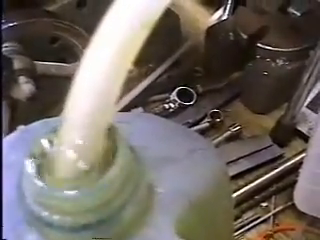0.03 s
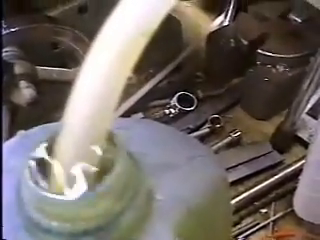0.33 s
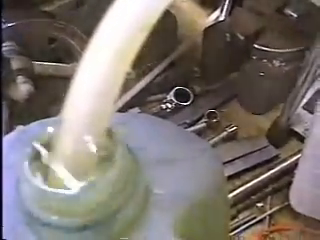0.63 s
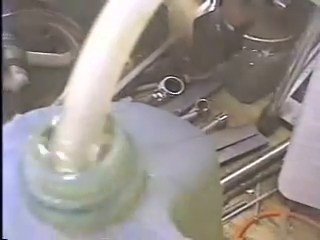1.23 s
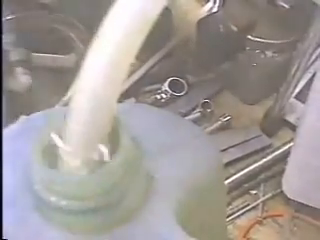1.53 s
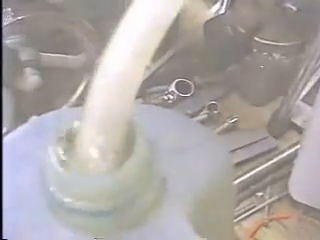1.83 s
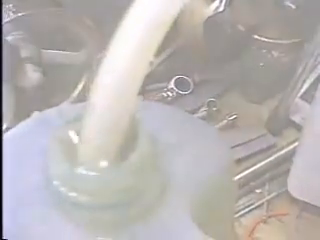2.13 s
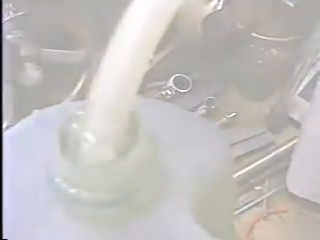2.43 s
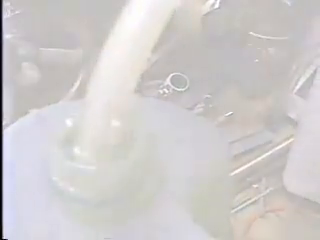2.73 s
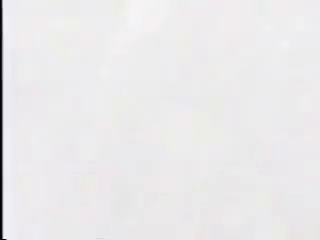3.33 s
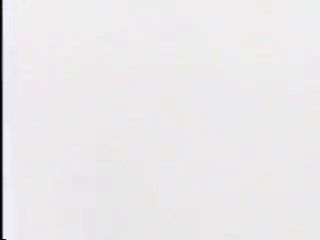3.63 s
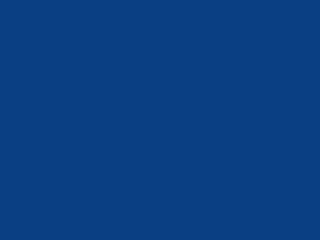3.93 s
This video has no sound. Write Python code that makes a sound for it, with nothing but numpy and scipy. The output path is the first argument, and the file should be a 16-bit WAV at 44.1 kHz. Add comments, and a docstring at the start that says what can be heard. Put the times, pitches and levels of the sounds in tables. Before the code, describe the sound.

From the start, liquid streams from a hose into a plastic jug on the left, a quiet, hollow rush with many small bubbles and occasional larger gulps. A pump motor hums faintly underneath. From about 2.3 seconds the filling and hum fade, with a few weaker gulps near 2.9 and 3.4 seconds. A soft, steady hiss remains on both sides until everything cuts out at about 3.9 seconds.

```python
"""A pump sends a steady stream of liquid through a hose into a plastic jug in a workshop.
From the start, on the left, the motor hums and the stream rushes into the hollow jug,
where trapped air rings as many small bubbles and a few larger gulps.
After about two seconds all of this fades, leaving the recorder's hiss on both sides.
Just before four seconds the sound cuts out."""
import sys
import numpy as np
from scipy import signal
from scipy.fft import rfft, irfft, next_fast_len
from scipy.io import wavfile
from scipy.ndimage import map_coordinates

SR = 44100
rng = np.random.default_rng(int(sys.argv[2]) if len(sys.argv) > 2 else 0)


def materialize(psi):
    """Save the field psi as 16-bit PCM at rate SR to the path in sys.argv[1].

    A 1-D psi becomes a single channel; in a 2-D psi each row is a channel.
    """
    bounded = np.clip(np.atleast_2d(psi).T, -1, 1)
    quanta = np.round(bounded * 32767).astype(np.int16)
    wavfile.write(sys.argv[1], SR, quanta)


N = 176400

# Tone of the hiss on each side, from low to high: frequency_hz, level_db
HISS_LEFT_TONE = [(20, 9.5), (40, -10), (68, -20), (100, 0), (190, 1.5), (800, 3), (2500, -2), (5000, -5),
                  (8500, -12.3), (10200, -19.5), (11500, -50)]
HISS_RIGHT_TONE = [(20, 11.5), (42, -0.5), (62, 0), (100, 1.5), (500, -0.5), (2000, -2), (5000, -4.5),
                   (8500, -8.5), (10200, -15), (11500, -29.5)]
# The left hiss grows a little near the end: time_s, level_db
HISS_LEFT_LEVEL = [(0, -57.5), (3.05, -57), (3.5, -55.5), (3.9, -54.5)]
# How far the wave sits off zero, where 1 is full scale: left_offset, right_offset
ZERO_OFFSET = [-0.0036, -0.0014]
# The tones that make up the motor's hum: cycles_per_shaft_turn, level_db
HUM_TONES = {4: -69.5, 7: -52, 8: -53.3, 14: -55, 21: -70, 28: -69, 40: -69.5}
# How the hum is turned up or down, before the fade: time_s, gain_db
HUM_GAIN = [(0, 1), (2.4, -0.5), (2.8, 1.5), (3.6, 4)]
# Overall tone of the liquid in the jug: frequency_hz, level_db
LIQUID_TONE = [(20, -61), (80, -46), (190, -17), (260, -5), (400, 0.5), (700, -1), (1100, -4.5), (1650, -4),
               (2100, -11), (3000, -15.5), (5000, -25), (9000, -50.5)]
# Pitches at which the jug and its surroundings ring: pitch_hz, half_width_hz, boost_db
JUG_RESONANCES = [(340.3, 15, 6.5), (381.4, 16.7, 8), (426.4, 43, 9.2), (497.3, 28, 7), (574, 17.5, 5.5),
                  (635, 8.4, 3.5), (750, 19, 4), (838, 13.7, 11.5), (871.8, 24.8, 10.5), (1034, 100, 4.5),
                  (1333, 12, 7), (1437, 18, 5), (1509, 12, 2.5), (1630, 30, 2.5), (1880, 23, 6.5),
                  (1936, 26, 8.3)]
# Large air pockets, each at its loudest moment: time_s, level_db, pitch_hz
AIR_POCKETS = [(0.075, -40, 399), (0.145, -44, 391), (0.56, -44, 484), (0.645, -41, 402), (1.045, -43, 405),
               (1.455, -44, 433), (1.495, -42, 456), (1.8, -44, 421), (1.875, -42, 388), (2.055, -45, 452),
               (2.86, -48, 416), (2.955, -50, 426), (3.43, -54.5, 403)]
# Strength of the small bubbles, before the fade: time_s, level_db
BUBBLE_LEVEL = [(0, -48.5), (1.4, -50), (1.85, -47), (2.2, -49), (2.6, -55.5), (3.9, -53)]
# The fade shared by the motor, bubbles and stream: time_s, gain_db
FADE_GAIN = [(0, -0.7), (.6, -0.73), (1.3, 0.24), (1.95, 0.5), (2.3, -0.8), (2.7, -5), (3.1, -10),
             (3.5, -12.5), (3.9, -16)]


def amp(db):
    """Turn decibels into a number to multiply by."""
    return 10 ** (np.asarray(db) / 20)


def unit(x):
    """Scale a sound so its average strength (rms) is 1."""
    return x / np.sqrt(np.mean(x ** 2) + 1e-20)


def along(points, hz):
    """Join (frequency_hz, value) points, with every octave equally wide."""
    frequencies, values = np.transpose(points)
    return np.interp(np.log(hz + 1), np.log(frequencies + 1), values)


def curve(rows):
    """Join (time_s, value) points to get a value for every sample."""
    return np.interp(np.arange(N) / SR, *np.transpose(rows))


def wobble(per_s):
    """A smooth curve through per_s random values each second."""
    points = rng.standard_normal(int(N * per_s / SR) + 4)
    return map_coordinates(points, [np.arange(N) * per_s / SR])


def filtered(x, gain_at):
    """Turn each frequency up or down by gain_at(hz)."""
    size = next_fast_len(N + SR // 2)
    hz = np.fft.rfftfreq(size, 1 / SR)
    return irfft(rfft(x, size) * gain_at(hz), size)[..., :N]


def hiss(tone):
    """The electronics make a steady, soft noise."""
    return unit(filtered(rng.standard_normal(N), lambda hz: amp(along(tone, hz))))


def motor(shaft_hz=59.75, whine_hz=5808, whine_db=-73.5, drift=0.00069, waver_db=1.1, flutter_rad=0.27):
    """The pump hums at multiples of its turning speed, with a thin whine on top."""
    clock = np.cumsum(1 + drift * wobble(2.88)) / SR  # the speed wanders slightly
    hum = np.zeros(N)
    for multiple, db in HUM_TONES.items():
        phase = 2 * np.pi * (multiple * shaft_hz * clock + rng.random())
        phase += flutter_rad * wobble(45)  # a quick flutter roughens the tone
        hum += amp(db + waver_db * wobble(14)) * np.sin(phase)
    whine = amp(whine_db + waver_db * wobble(3.2)) * np.sin(2 * np.pi * whine_hz * clock)
    return amp(curve(HUM_GAIN)) * hum + whine


def jug(x, size=16384):
    """The hollow jug colours a sound and rings along with it; the result has strength 1."""
    hz = np.fft.rfftfreq(size, 1 / SR)
    boost_db = sum(db * np.exp(-((hz - pitch) / width) ** 2) for pitch, width, db in JUG_RESONANCES)
    tone_db = along(LIQUID_TONE, hz) + boost_db
    # These steps make the ringing come after each sound, never before it.
    cepstrum = irfft(np.log(amp(tone_db)))
    cepstrum[1:size // 2] *= 2
    cepstrum[size // 2 + 1:] = 0
    ringing = irfft(np.exp(rfft(cepstrum)))
    return unit(signal.fftconvolve(x, ringing)[:N])


def gulps(swell_s=0.022, decay_s=0.032, rise_hz_per_s=350):
    """Now and then a large air pocket swells, rings with a rising pitch and dies away."""
    out = np.zeros(N)
    for peak_s, db, hz in AIR_POCKETS:
        t = np.arange(N) / SR - peak_s
        loudness = np.exp(-(t / np.where(t < 0, swell_s, decay_s)) ** 2)
        cycles = hz * t + rise_hz_per_s * t ** 2 / 2 + rng.random()
        out += amp(db) * loudness * np.sin(2 * np.pi * cycles)
    return out


def bubbles(per_s=260, middle_hz=524, spread=0.509, life_cycles=7.6, rise_per_life=0.14, scatter_db=2.5):
    """Air dragged under by the stream rings in the jug as short, rising blips."""
    count = int(per_s * N / SR)
    start, size = rng.random((count, 2)).T
    hz = np.clip(middle_hz * np.exp(spread * rng.standard_normal((count, 1))), 200, 5000)
    cycles = hz * np.arange(SR // 16) / SR  # one row for each bubble
    age = cycles / life_cycles
    rise = 1 + rise_per_life * np.minimum(age, 2) / 2
    loudness = np.exp(-2 * age) * (1 - np.exp(-2 * cycles))
    size_db = scatter_db * np.minimum(-np.log(1 - size), 3)  # many quiet, a few loud
    blips = amp(size_db)[:, None] * loudness * np.sin(2 * np.pi * cycles * rise)
    positions = (start * N).astype(int)[:, None] + np.arange(blips.shape[1])
    bubbling = np.bincount(positions.ravel(), blips.ravel(), N)[:N]  # add each blip at its own time
    return amp(curve(BUBBLE_LEVEL)) * jug(bubbling)


def stream(level_db=-42, surge_db=0.51, churn_db=0.24):
    """Swirling liquid rushes into the jug, with slower surges and faster churning."""
    flow_db = surge_db * wobble(20) + churn_db * wobble(45)
    return amp(level_db) * jug(amp(flow_db) * rng.standard_normal(N))


def scene():
    """The filling jug and the pump fade out on the left; hiss stays on both sides."""
    filling = amp(curve(FADE_GAIN)) * (stream() + bubbles() + motor()) + gulps()
    left = filling + amp(curve(HISS_LEFT_LEVEL)) * hiss(HISS_LEFT_TONE)
    right = amp(-56.5) * hiss(HISS_RIGHT_TONE)
    return np.array([left, right])


def record(dry, stop_s=3.897, drop_db=17, tail_db_per_s=230, top_hz=11500):
    """Shift the wave slightly off zero, cut it just before the end and remove the highest treble."""
    shifted = dry + np.array(ZERO_OFFSET)[:, None]
    after_s = np.arange(N) / SR - stop_s
    stop_db = np.where(after_s > 0, -drop_db - tail_db_per_s * after_s, 0)
    return filtered(shifted * amp(stop_db), lambda hz: hz < top_hz)


dry = scene()
out = record(dry)
materialize(out)
```